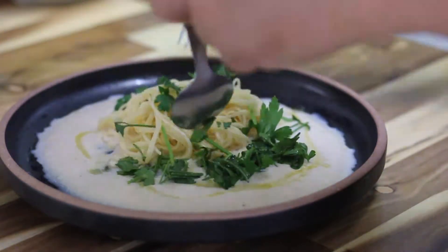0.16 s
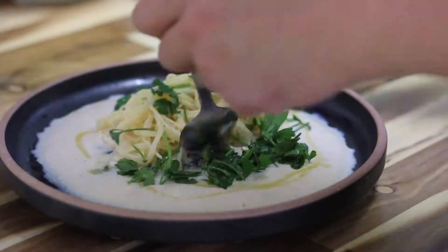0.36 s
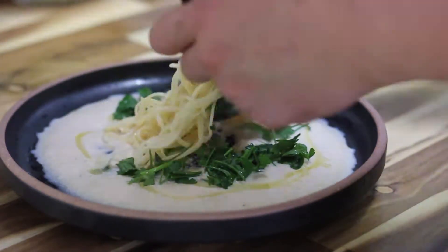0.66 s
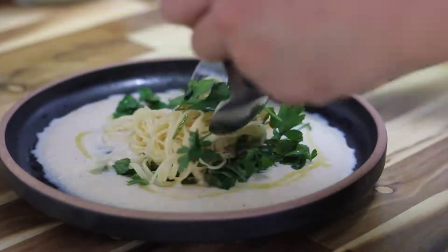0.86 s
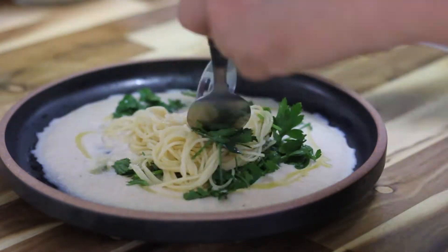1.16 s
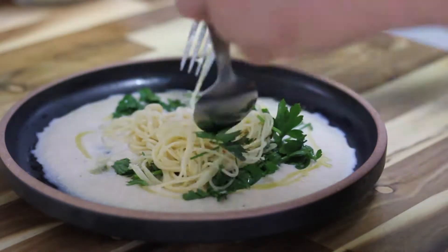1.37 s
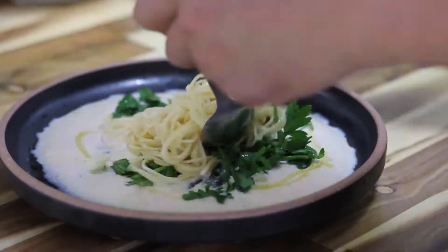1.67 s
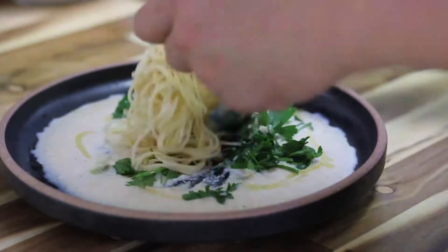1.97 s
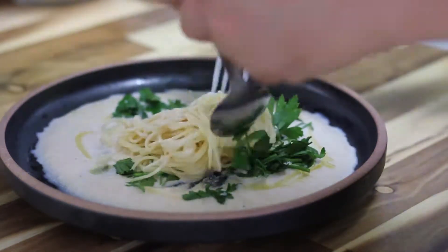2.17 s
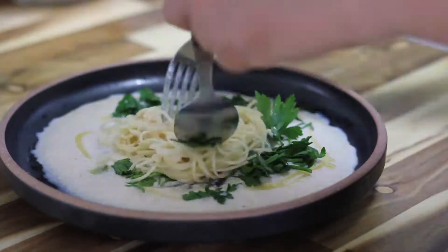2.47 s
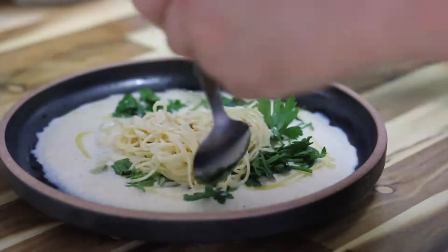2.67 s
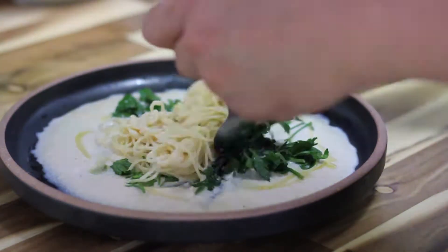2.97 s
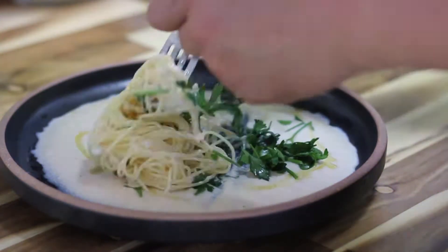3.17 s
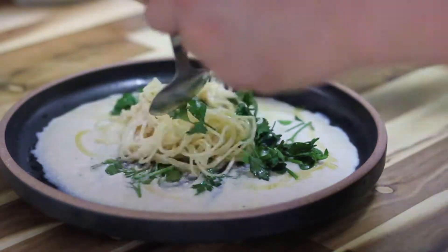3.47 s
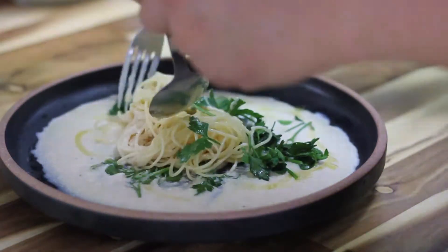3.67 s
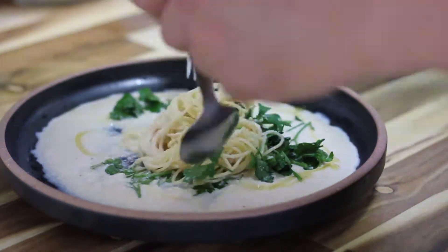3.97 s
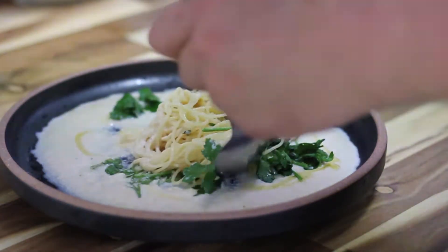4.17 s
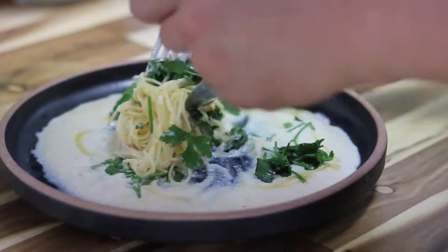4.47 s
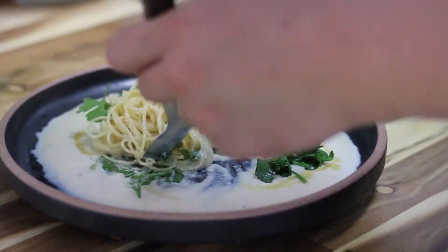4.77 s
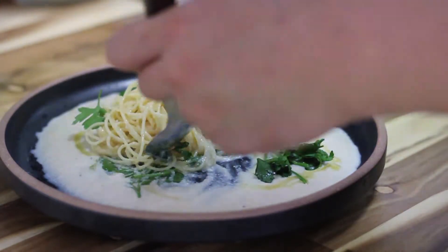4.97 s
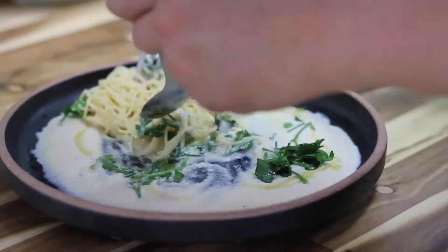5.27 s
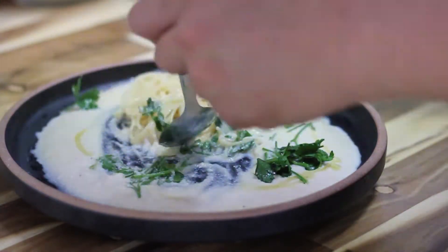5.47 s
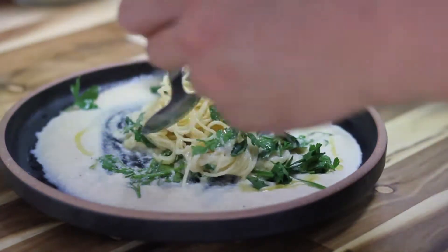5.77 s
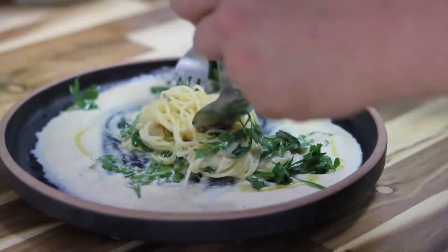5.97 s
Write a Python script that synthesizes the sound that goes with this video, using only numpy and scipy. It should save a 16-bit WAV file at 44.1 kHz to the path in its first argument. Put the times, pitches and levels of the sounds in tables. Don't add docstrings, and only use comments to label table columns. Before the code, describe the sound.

In a small hard kitchen, close to the plate, a fork and spoon twirl wet pasta. A loud double clack comes almost at once, the plate knocking on the wooden table. A bright clink follows, then mostly tiny sauce pops. Later the steel taps and scrapes the glaze briefly, and a rattling bounce comes near the end as the wet stirring swells. A refrigerator hums throughout.

```python
import sys
import numpy as np
from scipy import signal
from scipy.fft import rfft, irfft
from scipy.io import wavfile
from scipy.ndimage import uniform_filter1d

SR = 44100
rng = np.random.default_rng(int(sys.argv[2]) if len(sys.argv) > 2 else 0)


def transcribe(u):
    v = np.clip(np.atleast_2d(u).T, -1, 1)
    q = np.round(v * 32767).astype(np.int16)
    wavfile.write(sys.argv[1], SR, q)


def decibels_to_gain(level_db):
    exponent = np.asarray(level_db, float) / 20
    return 10 ** exponent


N = 269451


def evened(x):
    return x / np.sqrt(np.mean(x ** 2) + 1e-20)


def read(points, hz):
    f, value = np.transpose(points)
    return np.interp(np.log(hz + 1), np.log(f + 1), value)


def add(mix, s, sound):
    part = mix[round(s * SR):][:len(sound)]
    part += sound[:len(part)]


def wander(top_hz):
    t = np.arange(0, N + 64, 64) / SR
    drift = 0
    for f in np.geomspace(0.0758 * top_hz, top_hz, 16):
        drift = drift + np.sin(2 * np.pi * (f * t + rng.random())) / np.sqrt(f)
    return np.interp(np.arange(N) / SR, t, evened(drift))


def fridge():
    motor_orders = {2: -67.5, 4: -58.5, 7: -69, 8: -47, 10: -85, 11: -65.5, 12: -68, 13: -61, 14: -98, 15:
                    -72.5, 26: -73.5, 53: -74.5, 57: -82, 60: -75, 64: -73.5}
    # (pitch [Hz], level [dB rms])
    mains_buzz = [(119.8, -66.5), (239.6, -54)]
    # (frequency [Hz], density [dB per Hz])
    air_spectrum = [(25, -29), (60, -17.5), (110, -14.5), (200, -7), (232, 0), (270, -5.5), (440, -6.5),
                    (520, -10.5), (800, -15.5), (1050, -17), (3600, -24), (5000, -25.5), (15000, -36)]
    motor_hz, air_db = 58.97, -49.5
    t = np.arange(N) / SR
    shaft = 2 * np.pi * motor_hz * t + 0.051 * wander(1.49)
    hum = np.zeros(N)
    for multiple, db in motor_orders.items():
        hum += decibels_to_gain(db + 1.2 * wander(3.8)) * np.sin(multiple * shaft + 2 * np.pi * rng.random())
    for hz, db in mains_buzz:
        hum += decibels_to_gain(db + 2.1 * wander(24)) * np.sin(2 * np.pi * (hz * t + rng.random()))

    frames, bins_hz = N // 256 + 9, np.fft.rfftfreq(2048, 1 / SR)
    real, imaginary, patches = rng.standard_normal((frames // 2 + 4, 1025, 3)).T
    patches = evened(uniform_filter1d(uniform_filter1d(patches, 12, 0), 8, 1))
    noise = (real + 1j * imaginary) * decibels_to_gain(read(air_spectrum, bins_hz)[:, None] + 1.4 * patches)
    air = signal.istft(noise, nperseg=2048, noverlap=1536)[1][:N]
    return np.sqrt(2) * hum + decibels_to_gain(air_db) * evened(air)


def kitchen(x):
    # (delay [s], level [dB])
    early_echoes = [
        (.0055, -7.5),
        (.0082, -14),
        (.0112, -14),
        (.0192, -14.5),
        (.0275, -40),
    ]
    # (frequency [Hz], time to fall 60 dB [s])
    decay_times = [(150, 0.41), (500, 0.42), (1500, 0.33), (4000, 0.34), (9000, .3), (15000, 0.21)]
    taps = np.zeros(SR // 2)
    at = np.arange(200, len(taps) - 20, 20)
    taps[at + rng.integers(0, 20, len(at))] = rng.choice([-1., 1.], len(at))
    taps *= np.clip(np.arange(len(taps)) / SR / 0.014, 0, 1)
    hz, t, z = signal.stft(taps, SR, nperseg=256)
    fading = z * decibels_to_gain(-60 * t / read(decay_times, hz)[:, None])
    tail = signal.istft(fading, SR, nperseg=256)[1]
    tail *= decibels_to_gain(-2) / np.linalg.norm(tail)
    for s, db in early_echoes:
        tail[round(s * SR)] += decibels_to_gain(db)
    return signal.fftconvolve(x, tail)[:N]


def bubble(hz, cycles):
    turns = np.arange(1, 220) * hz / SR
    fade = 1.6 * turns / cycles
    pop = fade * np.exp(-fade) * np.sin(2 * np.pi * turns * (1 + 0.0037 * turns))
    return pop / abs(pop).max()


def sauce():
    # (time [s], peak [dB], pitch [Hz], length [cycles])
    sauce_pops = [(0.7748, -40, 9620, 2), (1.27, -29.5, 12700, 1.5), (1.727, -28.5, 13500, 2.1),
                  (1.809, -38, 8900, 2.4), (1.905, -30, 13500, 2), (2.0814, -43, 11500, 2.4),
                  (2.369, -33, 12200, 2.1), (2.397, -34, 12600, 2.2), (2.4384, -44, 9530, 2.4),
                  (2.4665, -32, 9210, 1.9), (2.5077, -32.5, 11200, 1.6), (2.6418, -39, 10400, 2.4),
                  (2.9934, -29, 11500, 1.5), (3.125, -30, 11100, 1.5), (3.2226, -37, 15000, 2.4),
                  (3.2535, -33, 14000, 2.4), (3.2954, -35.5, 11200, 2.1), (3.3653, -40, 9420, 2.4),
                  (3.4057, -27.5, 12700, 2.2), (3.8894, -29.5, 13500, 2.1), (4.5361, -38, 11400, 2.4),
                  (4.5491, -37, 13100, 2.4), (4.6069, -36, 11000, 2.2), (4.644, -29, 9450, 2.2),
                  (4.924, -39, 11700, 2.2), (5.0818, -25, 13300, 2.1), (5.17, -27.5, 9290, 1.6),
                  (5.2714, -31, 12500, 2.4), (5.2906, -31, 10200, 1.9), (5.971, -26.5, 10000, 1.3)]
    # (time [s], peak [dB], pitch [Hz], length [cycles])
    strand_pops = [(0.0262, -30.5, 5660, 1.1), (0.0453, -30.5, 6860, 1.8), (1.2292, -24, 3900, 1),
                   (1.835, -38, 5140, 1.8), (2.4859, -29.5, 4130, 1.3), (2.9756, -27.5, 5040, 1.3),
                   (3.273, -42, 5140, 1.8), (3.4191, -36, 6900, 1.4), (3.439, -36, 6020, 1.3),
                   (3.452, -42, 3750, 1.8), (3.5009, -42, 4120, 1.5), (4.5668, -32, 6070, 1.5),
                   (4.571, -33, 3150, 0.88), (4.594, -33.5, 5440, 1.5), (4.6254, -37, 5510, 1.8),
                   (5.0907, -34.5, 5100, 2.1), (5.191, -29, 3820, 2.2), (5.2127, -31, 4620, 1.1),
                   (5.3213, -43, 3760, 1.8), (5.6418, -35, 5750, 1.9), (5.7332, -37, 6710, 1.8),
                   (6.0247, -36, 3250, 1.5)]
    # (delay [s], level [dB])
    after_pops = [
        (.0016, -8.5),
        (.0037, -9),
        (.0068, -8),
    ]
    # (time [s], level [dB])
    stirring = [(0.0, -50.5), (0.32, -90), (0.49, -54), (0.97, -86), (1.62, -57.5), (2.13, -59),
                (2.77, -64), (3.03, -58.5), (3.37, -58), (3.52, -58.5), (4.58, -58), (4.71, -41),
                (4.88, -93), (5.12, -51.5), (5.58, -47.5), (5.75, -61), (5.97, -57), (6.11, -47.5)]
    burst_s, top_hz = 0.001, 15800
    out, crackle = np.zeros(N), np.zeros(N)
    for rows in (sauce_pops, strand_pops):
        for s, db, hz, cycles in rows:
            ring, snap = bubble(hz, cycles), bubble(0.77 * hz, 0.96)
            add(out, s + burst_s, decibels_to_gain(db) * (ring + decibels_to_gain(-12.5) * snap))
            for (late_s, late_db), (later, higher) in zip(after_pops, rng.uniform(.7, 1.3, (3, 2))):
                again = bubble(min(higher * hz, top_hz), cycles)
                add(out, s + burst_s + later * late_s, decibels_to_gain(db + late_db) * again)

    fizz_per_s, fizz_spread_db = 1400, 3.6
    strays_per_s, stray_db = 19, 9
    chance = rng.random(N)
    size = decibels_to_gain(fizz_spread_db * np.minimum(rng.exponential(1, N), 4)) * (chance < fizz_per_s / SR)
    size *= decibels_to_gain(stray_db * (chance < strays_per_s / SR))
    kind = rng.integers(0, 16, N)
    for k, hz in enumerate(np.linspace(3500, 15300, 16)):
        crackle += signal.oaconvolve(size * (kind == k), bubble(hz, hz / 6500))[:N]
    s, stir_db = np.transpose(stirring)
    return out + evened(crackle) * decibels_to_gain(np.interp(np.arange(N) / SR, s, stir_db) - 6)


def modes(peaks, size=4096):
    t = np.arange(size) / SR
    ring = np.zeros(size)
    for f, width, db in peaks:
        ring += decibels_to_gain(db) * width * np.exp(-np.pi * width * t) * np.sin(2 * np.pi * f * t)
    return ring / np.linalg.norm(ring)


def table():
    # (time [s], peak [dB], contact [ms], pitch region of the board that answers [Hz])
    plate_knocks = [(.302, -14.5, 1.43, 248), (.316, -17, 0.73, 234), (.337, -9, 1.13, 337),
                    (.351, -16, 1, 195), (.342, -15, 0.36, 740), (2.731, -31.5, 0.49, 700),
                    (2.79, -38, 0.46, 750), (2.869, -31.5, 0.3, 594), (3.733, -17.5, 0.89, 280),
                    (3.747, -13.5, 0.93, 490), (4.133, -15.5, 1, 373), (4.151, -35, 1.5, 333),
                    (4.21, -35, 1.2, 149), (5.448, -25, 0.51, 504), (5.5, -26.5, 0.31, 600)]
    # (pitch [Hz], width [Hz], level [dB])
    board_rings = [(107, 50, -1), (160, 19, -39), (219, 8.1, -20), (243.8, 5.2, 12), (309.5, 12.3, 4.5),
                   (383.5, 31, 2), (395, 19, 10.5), (523, 39, 10), (616, 23, 2.5), (747, 48, 3),
                   (850, 26, 11)]
    out = np.zeros(N)
    for s, db, ms, near_hz in plate_knocks:
        answering = [(hz, width, top_db - 14 * np.log2(hz / near_hz) ** 2)
                     for hz, width, top_db in board_rings]
        push = np.hanning(3 + int(ms * SR / 1000))
        thud = np.convolve(push, modes(answering))
        add(out, s, decibels_to_gain(db - 5) * thud / abs(thud).max())
    return signal.sosfilt(signal.butter(4, 110, "high", fs=SR, output="sos"), out)


def excited(rings, shares_db):
    return [(hz, width, np.sum(decibels_to_gain(2 * np.add(ways_db, shares_db)))) for hz, width, *ways_db in rings]


def ringing(rings, size=4096):
    hz = abs(np.fft.fftfreq(size, 1 / SR))
    power = sum(top / (1 + 0.26 * (2 * (hz - f) / width) ** 2) ** 2 for f, width, top in rings)
    log_level = np.log(power + 1e-7) / 2
    pulse = np.fft.ifft(np.exp(np.conj(signal.hilbert(log_level)))).real[:size // 2]
    return pulse / np.linalg.norm(pulse)


def spread(response, most_s, count=14):
    bins = len(response) + 1
    delay = most_s * np.interp(np.arange(bins), np.linspace(0, bins, count), rng.random(count))
    turn = np.exp(-1j * np.pi * np.cumsum(delay) * SR / len(response))
    return irfft(rfft(response, 2 * len(response)) * turn)


def contact(stroke, grit, plate_db, fork_db, spoon_db):
    # (pitch [Hz], width [Hz], touched at the rim [dB], on the slope [dB], in the well [dB])
    plate_rings = [(1006, 160, -30, -8.5, -9.5), (1300, 60, -5.5, -18, 3), (1468, 93, -12.5, -9, -9.5),
                   (2083, 95, 2.5, -8, -14), (2284, 111, -2.5, -7, -1.5), (2448, 56, -13.5, 1.5, -26),
                   (2730, 63, -24, -10, -20), (3080, 340, -17, -14.5, -9.5), (3460, 430, -26, -12.5, -18),
                   (3760, 170, -17.5, -20, -16)]
    # (pitch [Hz], width [Hz], scraped [dB], on edge [dB], clinked on the spoon [dB])
    fork_rings = [(2690, 140, -35, -35, -4), (3440, 150, -35, -35, 0.5), (4330, 370, -9, -15, -22),
                  (4830, 320, -1.5, -19, -6.5), (5280, 210, -1.5, -12, -0.5), (5790, 420, 0.5, -3, -18),
                  (6440, 250, -24, -0.5, -3)]
    # (pitch [Hz], width [Hz], scraped [dB], tapped [dB], clinked on the fork [dB])
    spoon_rings = [(7420, 760, -14, 0, -24), (8780, 340, -9.5, -3.5, -1.5), (10740, 670, 1, -12, -21),
                   (11970, 750, -4, 1, -1), (13300, 970, -14, -16, 0), (14500, 600, -12, -4, -10),
                   (15360, 1000, -12, -10, -5)]
    # (time [s], peak [dB])
    steel_blows = [(0.3009, -1), (.305, -9), (0.3377, -8), (0.3406, -11), (1.101, -2.5), (1.106, -22),
                   (1.112, -23), (1.1215, -30), (1.5806, -26), (2.856, -29), (3.7328, -14.5), (3.736, -25),
                   (4.1268, -15), (4.666, -33), (5.4295, -21), (5.4325, -13), (5.4402, -16), (5.4756, -10),
                   (5.499, -10), (5.5075, -15)]
    s, length, land_db, first_db, last_db = stroke
    settle_db_per_s, lift_s, land_s = 1300, 0.015, 0.0012
    start = s - .003
    t = np.arange(SR // 4) / SR - .003
    rings = excited(plate_rings, plate_db) + excited(fork_rings, fork_db) + excited(spoon_rings, spoon_db)
    response = ringing(rings)

    smooth, catch, size = rng.standard_normal(len(t)), rng.random(len(t)), rng.exponential(1, len(t))
    snags = evened((catch < 1500 / SR) * np.sign(smooth) * decibels_to_gain(1.8 * np.minimum(size, 3)))
    drive = np.sqrt(1 - grit) * smooth + np.sqrt(grit) * snags
    slow = uniform_filter1d(uniform_filter1d(catch - .5, size=90), size=90)
    drive *= decibels_to_gain(4.07 * evened(slow) - 1.35)
    jolt = decibels_to_gain(land_db - settle_db_per_s * abs(t))
    rubbing = decibels_to_gain(first_db + (last_db - first_db) * np.clip(t / length, 0, 1))
    touching = np.clip((length - t) / lift_s, 0, 1) * np.clip(t / land_s, 0, 1)
    sound = signal.fftconvolve(drive * (jolt + rubbing) * touching, response)

    for at, blow_db in steel_blows:
        if start < at < s + length:
            blow = spread(response, 0.001273)
            blow[8:10] += decibels_to_gain(-4.5) * abs(blow).max() * np.array([1, -1])
            add(sound, at - start - .0004, decibels_to_gain(blow_db - 5) * blow / abs(blow).max())
    return start, sound


def cutlery():
    # (start [s], length [s], landing [dB], rubbing at first [dB], rubbing at last [dB])
    strokes = [(0.301, 0.034, -37, -50, -46), (0.335, 0.056, -13, -33, -36), (1.1, 0.018, -15, -48, -54),
               (1.582, 0.024, -30, -33, -37.5), (2.857, 0.029, -25.5, -34, -42),
               (3.732, 0.077, -25, -31, -40.5), (4.126, 0.11, -26.5, -29.5, -25.5),
               (4.666, 0.074, -55, -42, -27), (5.43, 0.086, -22.5, -34, -27),
               (4.229, .038, -50, -33.5, -28), (4.728, 0.029, -50, -38.5, -25),
               (2.883, 0.025, -50, -34.5, -33)]
    snag_shares = [0.39, 0.57, 0.3, 0.13, 0.43, 0.89, 0.52, 0.4, 0.61, 0.42, 0.36, 0.43]
    # (rim [dB], slope [dB], well [dB])
    plate_shares = [(-1, -4, 1.5), (-11, -18, 4), (-22.5, -30, -42), (-3.5, -20, -2), (3, -11, -13),
                    (-8, -20, 1), (-30, -8.5, 0), (-12, 2.5, -8), (-9, -1.5, -21), (-4, -30, 0.5),
                    (-10, -13, -2.5), (1.5, -12, -12)]
    # (scraped [dB], on edge [dB], clinked [dB])
    fork_shares = [(-6, -5, -3.5), (-15.5, -27, -8.5), (-25, -25, -4), (-8.5, -12, -12), (-25, -3.5, -25),
                   (-10, -15, -12), (-22.5, -28, -23), (1.5, -15, -25), (-4, -24, -25), (-22, -23, -30),
                   (2, -12, -15), (-25, -3, -25)]
    # (scraped [dB], tapped [dB], clinked [dB])
    spoon_shares = [(-4, -8, -0.5), (-30, -19.5, -34), (-26, -28, 2), (-15, -10, -20), (-7.5, -11.5, -22),
                    (-14, -21, -22), (-40, -27.5, -32), (2.5, -20, -15), (1, -20, -22), (-33, -27, -32),
                    (-3, -13, -9), (-8.5, -11, -22)]
    out = np.zeros(N)
    for parts in zip(strokes, snag_shares, plate_shares, fork_shares, spoon_shares):
        add(out, *contact(*parts))
    return out


def scene():
    low_cut = signal.butter(2, 900, "high", fs=SR, output="sos")
    hard = signal.sosfilt(low_cut, cutlery()) + table()
    wet = sauce()
    room = kitchen(hard + decibels_to_gain(-2.5) * wet)
    return (hard + wet + room + fridge())[None]


def roll_off(x):
    return signal.sosfilt(signal.butter(12, 17130, fs=SR, output="sos"), x)


def record(dry):
    band_limit = signal.firwin(321, 15980, window=("kaiser", 5), fs=SR)
    limited = signal.oaconvolve(dry, band_limit[None], "same")
    return roll_off(limited)


dry = scene()
out = record(dry)
transcribe(out)
```